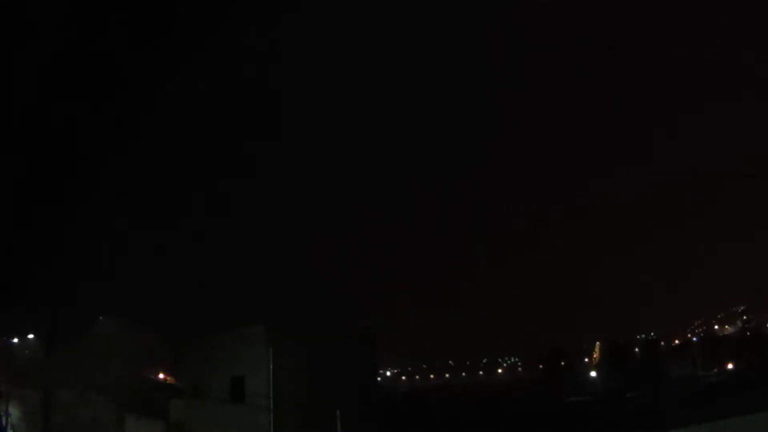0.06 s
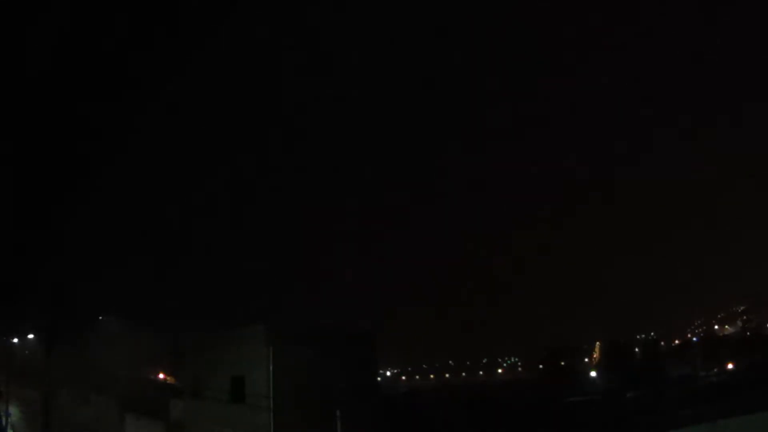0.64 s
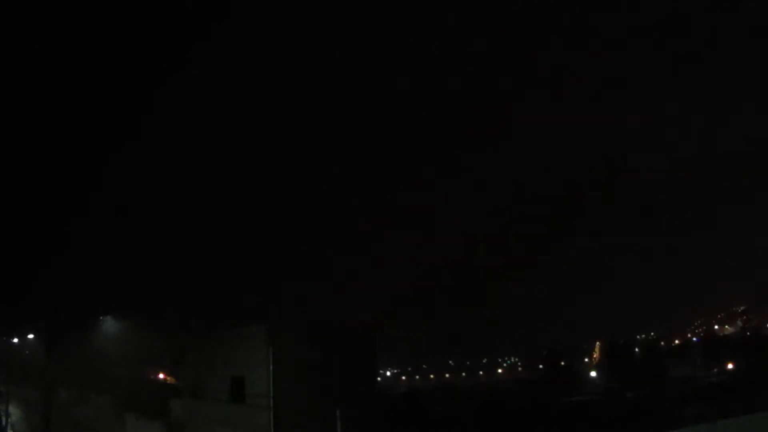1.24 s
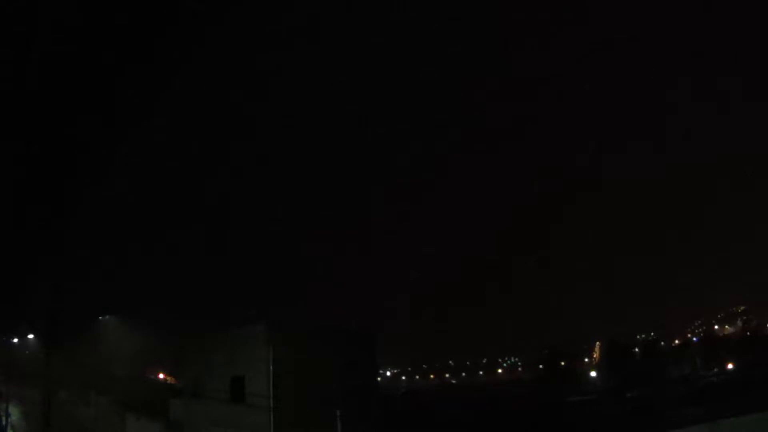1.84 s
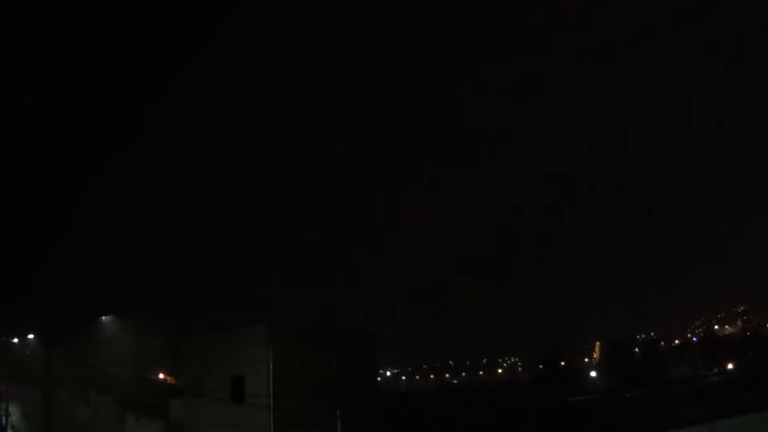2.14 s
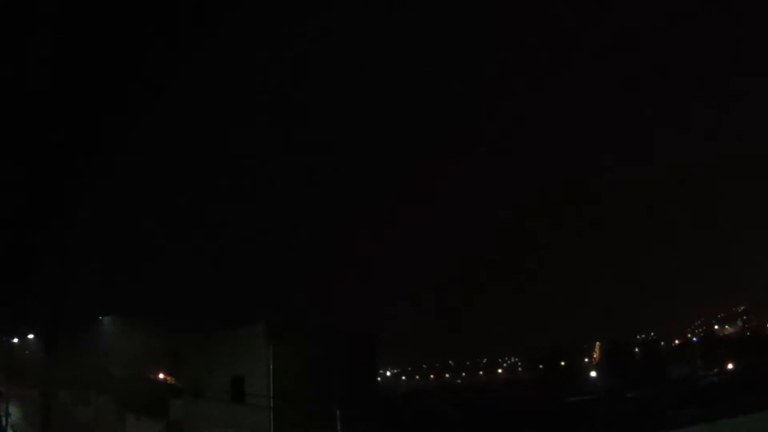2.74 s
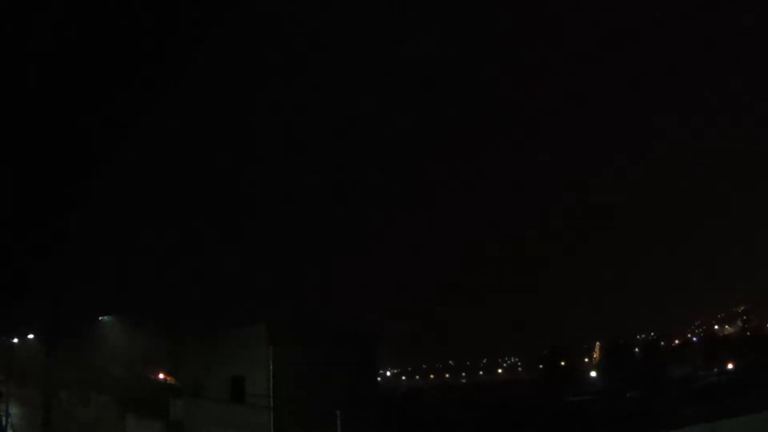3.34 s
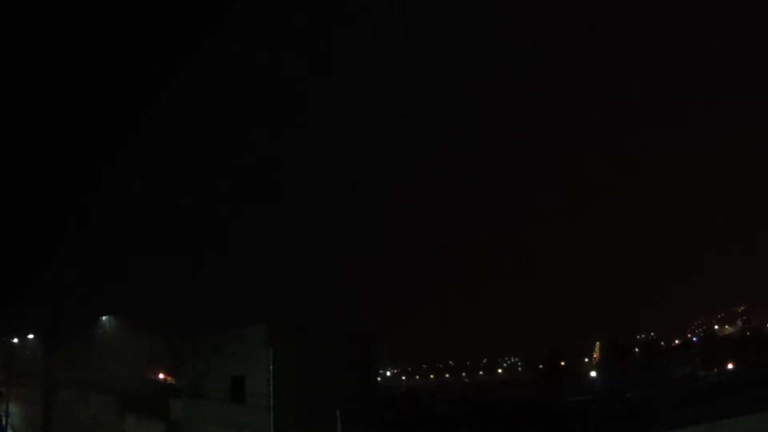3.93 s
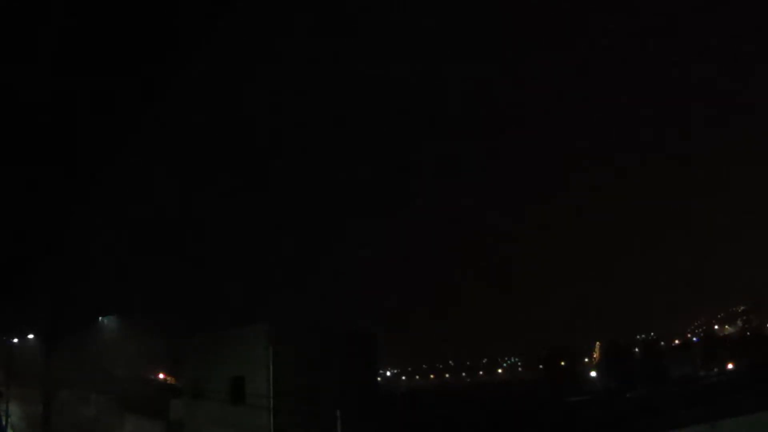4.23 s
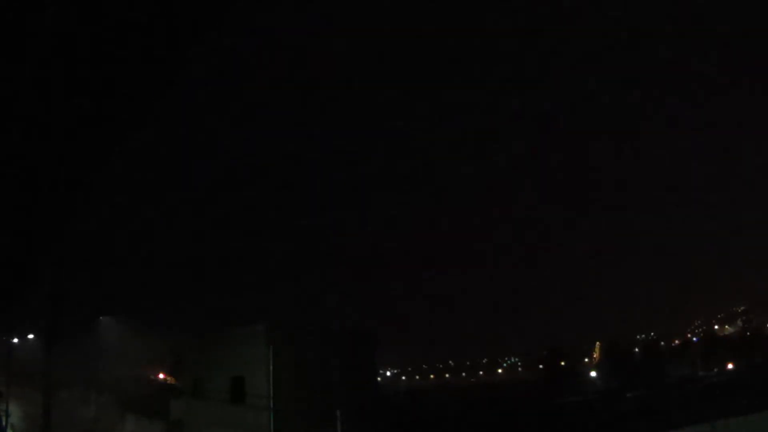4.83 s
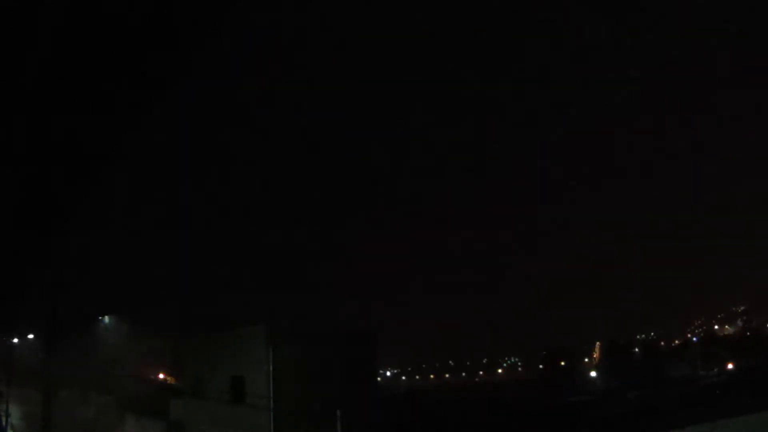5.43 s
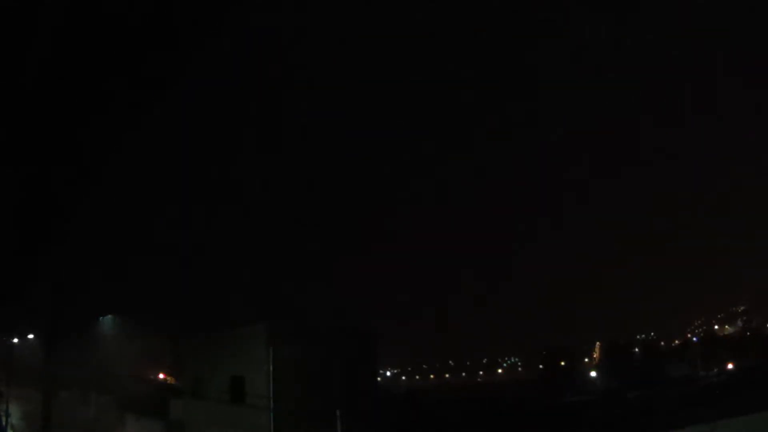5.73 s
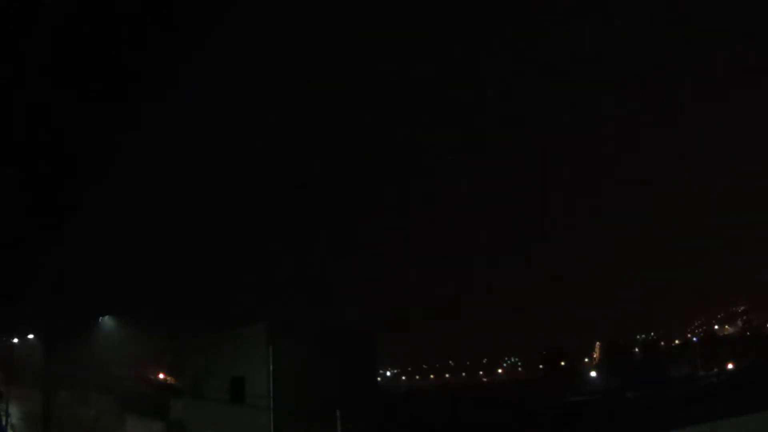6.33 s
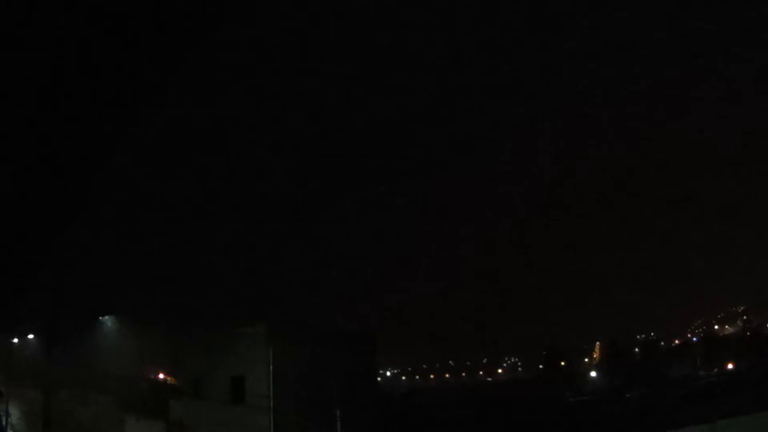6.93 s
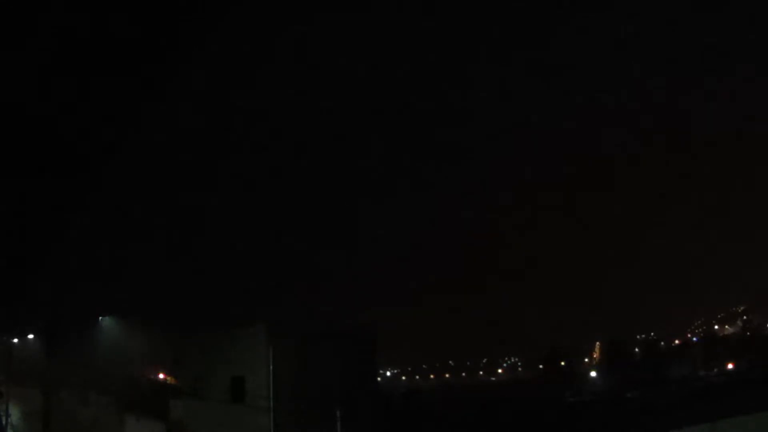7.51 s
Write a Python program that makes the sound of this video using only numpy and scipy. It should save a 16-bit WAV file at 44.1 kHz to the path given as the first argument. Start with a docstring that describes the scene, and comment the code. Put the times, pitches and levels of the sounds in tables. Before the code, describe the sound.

A deep, rough, engine-like rumble pulses close by, slightly to the right, against a steady wash of heavy night rain. Midway it surges into a thunderous boom, briefly pushing the rain down, then labours, recovers and slowly eases. Occasional drops tick close to the microphone, which sits in a faintly hollow shelter. A brief, distant bark-like sound comes near the end.

```python
"""A deep rumble like a close four-cylinder engine idles, revs, labours almost to a stall and picks up.
Its firings form a harmonic series that booms whenever an order sweeps through a resonance of the body.
Behind it falls heavy night rain: countless impacts add to a wash, and a few near drops splash singly.
The hollow of the sheltered spot resonates; low hums, an intake rush and a far bark-like call pass briefly.
An automatic gain control ducks the rain under the engine's swells."""
import sys
import numpy as np
from scipy import signal
from scipy.fft import rfft, irfft
from scipy.io import wavfile
from scipy.ndimage import uniform_filter1d, minimum_filter1d

SR = 44100
rng = np.random.default_rng(int(sys.argv[2]) if len(sys.argv) > 2 else 0)


def put_to_file(sound):
    """Save the sound as 16-bit audio at rate SR, in the file named by the first command-line argument."""
    columns = np.atleast_2d(sound).T  # one column per channel
    safe = np.clip(columns, -1, 1)
    whole_steps = np.round(safe * 32767)
    wavfile.write(sys.argv[1], SR, whole_steps.astype(np.int16))


N = 333837
TIME, FREQS = np.arange(N) / SR, np.maximum(np.arange(N // 2 + 1) * SR / N, 1)

# engine speed: time_s, firing_rate_hz
FIRING_RATE = [(0, 30.3), (.8, 31), (1.75, 29.7), (2.62, 31.7), (2.89, 31), (3.07, 40), (3.24, 46),
               (3.43, 52.3), (3.58, 46.6), (3.8, 43), (4.01, 32.3), (4.3, 21.2), (4.5, 23.1), (4.75, 28.3),
               (4.92, 33), (5.07, 39.5), (5.35, 42.4), (5.6, 41), (5.87, 35.8), (6.6, 35.4), (7.0, 35.3),
               (7.57, 29)]
# how hard the engine pulls: time_s, fundamental_gain_db, load_db
ENGINE_LOAD = [(0, -3, -2.5), (.8, 1, 1.5), (1.7, -1.5, 0.5), (2.17, 1, 4.5), (2.88, 0, 0.5),
               (2.95, 7.5, 8), (3.01, 8, 9), (3.07, -3, 17), (3.14, 4, 19), (3.2, 8, 17.5), (3.24, 13, 21),
               (3.3, 10, 22), (3.36, 10, 17), (3.42, -1, 18.5), (3.48, -2, 10.5), (3.545, -11, 5.5),
               (3.59, 5.5, 18.5), (3.69, 7.5, 15), (3.79, 0.5, 12), (3.84, 2.5, 11), (3.88, -5, 5),
               (3.92, 1.5, 5), (4.01, 3.5, 9), (4.09, 4, 3.5), (4.15, -3, 7.5), (4.24, 0, 6),
               (4.31, -7, 1.5), (4.45, -13, 6), (4.53, 2, 12.5), (4.62, -2.5, 13), (4.7, -5, 4),
               (4.77, 5, 0), (4.85, 5.5, 4), (4.92, 10, 9.5), (5.0, 2.5, 6), (5.07, -3, 8), (5.14, 3.5, 7),
               (5.19, -4, 8), (5.25, 2.5, 11.5), (5.4, 4, 1), (5.72, -2.5, 3), (6.52, -1, 2.5),
               (6.94, -4, 0), (7.0, -9, -2), (7.08, 0.5, -7), (7.2, 0, 0), (7.34, -11, 0), (7.43, -3.5, 2),
               (7.57, -3.5, -3)]
# harmonics of the firing rate: multiple, gain_db
FIRING_ORDERS = [(1, 0), (2, -7.5), (3, -9), (4, -10.5), (5, -12.5)]
# resonances of the body around the engine: centre_hz, width_hz, boost_db
BODY_MODES = [(34.05, 32.4, 21.5), (84.7, 25.7, 13.5), (130, 9.6, 8)]
# spectrum of the engine's rough drone: frequency_hz, relative_db
DRONE_SPECTRUM = [(20, -1.5), (45, 1.5), (70, 0.5), (110, -3), (145, -3), (180, 2.5), (235, 0.5), (272, -2),
                  (305, -7.5), (370, -16), (500, -22), (900, -49)]
# tones of the labouring engine: start_s, end_s, pitch_hz, level_db
LABOUR_GROANS = [(4.152, 4.353, 260.6, -20), (4.417, 4.714, 261.1, -18.5), (5.22, 5.73, 128.8, -24)]
# spectrum of the rain: frequency_hz, left_relative_db, right_relative_db
RAIN_SPECTRUM = [(397, -1, 6.5), (458, -4, 0.5), (1040, -1, -0.4), (1780, -2.5, 2.5), (2330, -7.5, -2),
                 (2770, -9.5, -2.5), (3680, -14.5, -8), (4340, -15, -7), (5330, -12, -9.5),
                 (5580, -15, -15.5), (6410, -18, -12), (8760, -19.5, -24.5), (9800, -24, -25),
                 (11900, -31.5, -34)]
# part of the rain's power that comes straight from the open side: frequency_hz, share
DIRECT_SHARE = [(300, 1), (900, 0.63), (1400, 0.98), (1950, 0.4), (2300, 0.15), (4000, 0.69), (4600, 0.1),
                (5200, 0.1), (6600, 0.52), (8200, 0.07), (11000, 0.24)]
# brief lifts of the rain's hiss, mostly where the engine sags: start_s, end_s, boost_db
HISS_LIFTS = [(1.25, 1.72, 0), (2.25, 2.8, 0.5), (3.5, 3.602, 0.5), (4.14, 4.42, 1), (4.42, 5.02, 2),
              (6.925, 7.11, 1.5)]
# drops that land nearby: start_s, decay_s, centre_hz, width_hz, level_db
NEAR_DROPS = [(0.41, 0.006, 4970, 1900, -29), (1.453, 0.0064, 5240, 3400, -29),
              (1.491, 0.012, 6200, 1600, -31), (1.508, .008, 7700, 2000, -33),
              (1.644, .005, 5070, 1200, -30), (1.658, 0.006, 4700, 1500, -28),
              (2.419, 0.01, 7260, 2600, -33), (2.492, 0.009, 6200, 3400, -30),
              (2.824, 0.0055, 5700, 1500, -34), (2.918, .012, 2570, 700, -21),
              (3.411, 0.0078, 2700, 1200, -27), (4.563, .009, 2960, 1400, -27),
              (4.633, 0.0085, 4000, 1496, -29), (5.474, 0.0062, 6500, 3500, -30),
              (5.582, 0.017, 2642, 600, -29), (5.954, 0.0049, 2587, 700, -33),
              (6.569, 0.01, 3107, 1405, -30), (6.958, .006, 4600, 2400, -28),
              (6.975, 0.009, 4416, 700, -31)]
# resonances of the hollow: centre_hz, width_hz, level_db, wander_share
HOLLOW_MODES = [(222.2, 9.3, -30.5, 0.0049), (243.4, 7.8, -30, 0.0053), (259.8, 9, -29.5, 0.0045),
                (289, 10.3, -35, 0.00983), (379, 45, -42, 0.0245), (741, 113, -31.5, 0.02017),
                (1203, 233, -33, .03)]
# short mid-pitched swells (hums, intake rush, far call): start_s, end_s, centre_hz, width_hz, level_db
MID_SWELLS = [(2.065, 2.253, 176, 45, -20), (3.053, 3.097, 1310, 510, -27),
              (4.162, 4.359, 285.5, 16, -21.5), (6.987, 7.098, 1509, 620, -38),
              (7.014, 7.12, 790, 120, -22.5), (7.22, 7.5, 230.5, 30, -24.5), (7.41, 7.502, 750, 90, -34)]


def engine(base_db=-32.5, flutter_db=1.0, max_flutter_db=5.5, wobble_rad=0.15, muffler_hz=195):
    """Periodic firing yields a harmonic series, shaped by load, body and muffler, over a rough drone."""
    (firing_hz,), (fundamental_db, load_db) = in_time(FIRING_RATE), in_time(ENGINE_LOAD)
    phase = 2 * np.pi * np.cumsum(firing_hz) / SR
    tones = 0
    for multiple, order_db in FIRING_ORDERS:
        hz = multiple * firing_hz
        pull_db = fundamental_db if multiple < 2 else load_db   # load sharpens the firings
        # uneven firing smears the higher orders most
        uneven_db = min(flutter_db * multiple, max_flutter_db) * drift(11)
        uneven_rad = (multiple - 1) * (wobble_rad * drift(8) + rng.uniform(0, 2 * np.pi))
        muffling = 1 / np.hypot(1, (hz / muffler_hz) ** 4)
        gain = muffling * from_db(base_db + order_db + pull_db + body_boost_db(hz) + uneven_db)
        tones += gain * np.sin(multiple * phase + uneven_rad)
    return np.sqrt(2) * tones + drone(firing_hz, phase, load_db)


def body_boost_db(hz):
    """Forced resonance: the body amplifies a tone that lies near one of its natural frequencies."""
    return sum(db / (1 + (2 * (hz - centre) / width) ** 2) for centre, width, db in BODY_MODES)


def drone(firing_hz, phase, load_db, idle_db=-20, idle_hz=29.7, fade_db_per_hz=0.08, lag_rad=2.7):
    """Amplitude modulation: noise swells after every firing, growing with load and fading with speed."""
    noise = irfft(white() * from_db(in_hz(DRONE_SPECTRUM)[0]), N)
    throb = 1 + 0.34 * np.sin(phase - lag_rad)
    level_db = idle_db + 0.11 * load_db - fade_db_per_hz * (firing_hz - idle_hz)
    return from_db(level_db) * rms_one(noise * throb)


def exhaust(hz=95, width_hz=90, base_db=-37):
    """Turbulence: ragged exhaust flow makes low noise that grows with the load."""
    _, load_db = in_time(ENGINE_LOAD)
    return from_db(base_db + load_db) * resonant_noise(hz, width_hz)


def whirr(hz=1450, width_hz=800, revved_db=-36, revved_hz=50, exponent=7.0, lag_s=0.1):
    """Mechanical noise follows a steep power law of engine speed, trailing it a little."""
    firing_hz = np.interp(TIME - lag_s, TIME, in_time(FIRING_RATE)[0])
    return from_db(revved_db) * (firing_hz / revved_hz) ** exponent * resonant_noise(hz, width_hz)


def groans(waver_rad=0.28):
    """Random phase modulation makes the low tones of the labouring engine waver."""
    tones = 0
    for start, end, hz, db in LABOUR_GROANS:
        phase = 2 * np.pi * hz * TIME + waver_rad * drift(11)
        tones += from_db(db) * swell(start, end) * np.sin(phase)
    return np.sqrt(2) * tones


def rain(level_db=-25.0, lag_s=0.00014, flicker_db=0.79):
    """Direct sound from the open side reaches the left first; the diffuse field comes from all round."""
    share = np.clip(in_hz(DIRECT_SHARE)[0], 0, 1)
    direct = patter() * np.exp(-2j * np.pi * FREQS * lag_s * np.array([[0], [1]]))
    diffuse = np.array([patter(), patter()])
    field = np.sqrt(share) * direct + np.sqrt(1 - share) * diffuse
    wash = irfft(field * from_db(in_hz(RAIN_SPECTRUM)), N)
    lifts_db = sum(db * swell(start, end) for start, end, db in HISS_LIFTS)
    return rms_one(wash) * from_db(level_db + lifts_db + flicker_db * drift(7))


def patter(near_db=-4.0, crisp_hz=2200):
    """Superposition: far rain merges into a noise spectrum; near drops stand out in the treble."""
    near = from_db(near_db) * FREQS / np.hypot(FREQS, crisp_hz)
    return (white() + near * drops(per_s=1800, spread_db=3.0, width_hz=820)) / np.hypot(1, near)


def drops(per_s, spread_db, width_hz, pitches=12):
    """Impulse response: random impacts each ring a damped resonator; returns their spectrum."""
    onsets = rng.integers(0, N, int(per_s * N / SR))
    sizes = from_db(spread_db * np.minimum(rng.exponential(1, len(onsets)), 5))
    sizes *= rng.choice([-1, 1], len(onsets))
    radius = np.exp(-np.pi * width_hz / SR)
    ringing = 0
    for k, hz in enumerate(np.linspace(1500, 11000, pitches)):
        clicks = np.bincount(onsets[k::pitches], sizes[k::pitches], N) + 1e-18
        feedback = [1, -2 * radius * np.cos(2 * np.pi * hz / SR), radius ** 2]
        ringing += signal.lfilter([1, -radius], feedback, clicks)
    return rfft(rms_one(ringing)) / np.sqrt(N / 2)


def splashes(pan_db=3.0, tick_db=-5.0, tick_s=0.0049, size=4410):
    """Impact transients: each drop close on the right gives a broad tick and a band of dying spray."""
    out = np.zeros((2, N))
    for start, decay, hz, width, db in NEAR_DROPS:
        at = int(start * SR)
        spray = burst(hz - width / 2, hz + width / 2, decay, size)
        tick = from_db(tick_db) * burst(2000, 7300, tick_s, size)
        out[:, at:at + size] += from_db(db) * (spray + tick)
    return out * from_db([[-pan_db], [pan_db]])


def hollow():
    """Cavity resonance: the hollow rings on with a slightly straying pitch."""
    return sum(from_db(db) * wander(resonant_noise(hz, width), share)
               for hz, width, db, share in HOLLOW_MODES)


def mid_swells():
    """Enveloped band noise: low hums, a rush of intake as the engine revs, a distant bark-like call."""
    return sum(from_db(db) * swell(start, end) * resonant_noise(hz, width)
               for start, end, hz, width, db in MID_SWELLS)


def gain_control(x, threshold_db=-15.0, slope=0.5, window_s=0.0159, release_db_per_s=55, makeup_db=0.61):
    """Compression: loud passages turn everything down at once, and the gain recovers more slowly."""
    window = int(window_s * SR)
    bass_cut = signal.butter(1, 30, "high", fs=SR, output="sos")   # the deepest bass counts less
    power = uniform_filter1d(np.mean(signal.sosfilt(bass_cut, x) ** 2, axis=0), window)
    level_db = 10 * np.log10(np.maximum(power, 1e-9))
    release_db = release_db_per_s * TIME
    held_db = np.maximum.accumulate(level_db + release_db) - release_db
    excess_db = uniform_filter1d(np.maximum(held_db - threshold_db, 0), window)
    return x * from_db(makeup_db - slope * excess_db)


def limiter(x, ceiling=0.97, size=441):
    """Peak limiting: a smoothed gain eases peaks down just under full scale."""
    gain = ceiling / np.maximum(np.abs(x).max(axis=0), ceiling)
    return x * uniform_filter1d(minimum_filter1d(gain, size), size)


def resonant_noise(hz, width_hz):
    """Noise filtered by one steep-sided resonance, at unit rms."""
    detune = (FREQS ** 2 - hz ** 2) / (FREQS * width_hz)
    return rms_one(irfft(white() / (1 + detune ** 2 / 2), N))


def burst(low_hz, high_hz, decay_s, size):
    """Exponential decay of a band of stereo noise, from unit rms."""
    band = signal.butter(2, [low_hz, high_hz], "band", fs=SR, output="sos")
    noise = rms_one(signal.sosfilt(band, rng.standard_normal((2, size))))
    return noise * np.exp(-TIME[:size] / decay_s)


def wander(x, share, rate_hz=6.0):
    """Frequency modulation: a drifting delay lets the pitch stray by a share of itself."""
    return np.interp(TIME + np.cumsum(share * drift(rate_hz)) / SR, TIME, x, period=N / SR)


def drift(rate_hz):
    """Band-limited random motion at unit rms: three new values per cycle, joined smoothly."""
    steps = TIME * min(3 * rate_hz, 120)
    knots = signal.resample_poly(rng.standard_normal(1024), 8, 1)
    return rms_one(np.interp(steps * 8, np.arange(len(knots)), knots))


def swell(start_s, end_s):
    """Amplitude envelope with a rounded rise and fall."""
    progress = np.clip((TIME - start_s) / (end_s - start_s), 0, 1)
    return np.sqrt(np.abs(np.sin(np.pi * progress)))


def white():
    """Spectrum of white noise: equal mean power at every frequency."""
    return rng.standard_normal(len(FREQS)) + 1j * rng.standard_normal(len(FREQS))


def in_time(rows):
    """Linear interpolation over time, one curve per column."""
    times, *columns = np.transpose(rows)
    return [np.interp(TIME, times, column) for column in columns]


def in_hz(rows):
    """Interpolation over log frequency, one spectrum per column."""
    hz, *columns = np.transpose(rows)
    return np.array([np.interp(np.log(FREQS), np.log(hz), column) for column in columns])


def from_db(db):
    """Decibels to amplitude ratio."""
    return 10 ** (np.asarray(db) / 20)


def rms_one(x):
    """Normalisation to unit rms."""
    return x / np.sqrt(np.mean(x ** 2) + 1e-20)


def scene():
    """Superposition: engine, hollow and swells, set to the right by a level difference, add to the rain."""
    mono = engine() + exhaust() + whirr() + groans() + hollow() + mid_swells()
    return mono * from_db([[-2.3], [1.8]]) + rain() + splashes()


def record(dry):
    """Compression and peak limiting, then a steep low-pass filter."""
    cutoff_hz, edge_hz = 11150, 150
    low_pass = np.clip((cutoff_hz - FREQS) / edge_hz + 0.5, 0, 1)
    return irfft(rfft(limiter(gain_control(dry))) * low_pass, N)


dry = scene()
out = record(dry)
put_to_file(out)
```